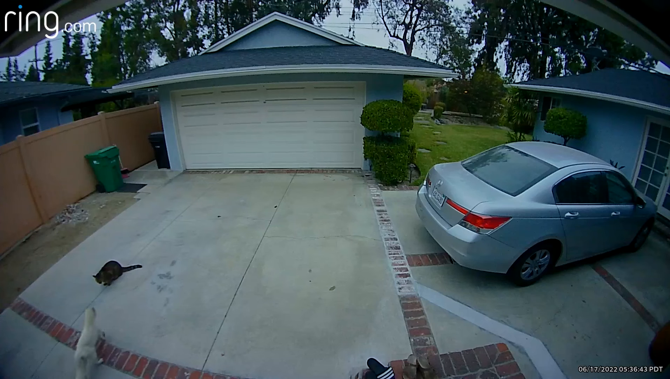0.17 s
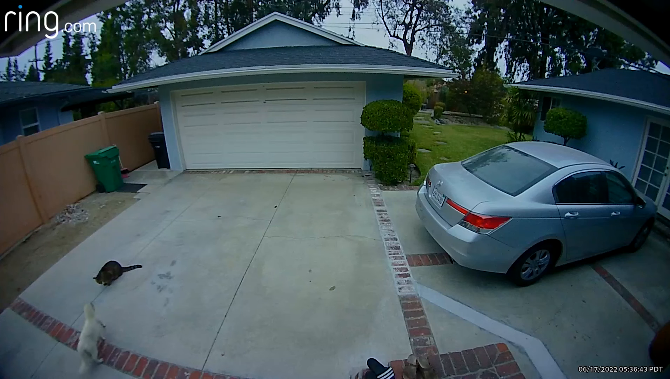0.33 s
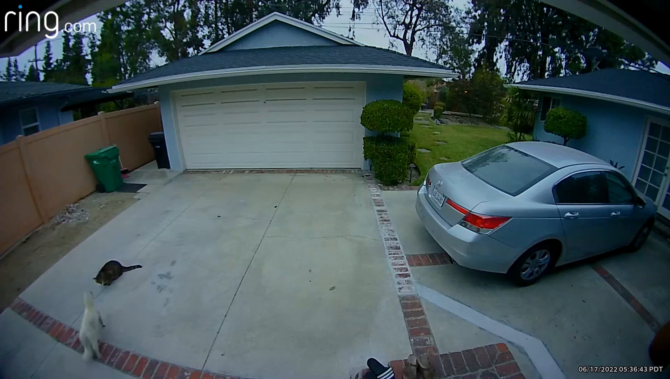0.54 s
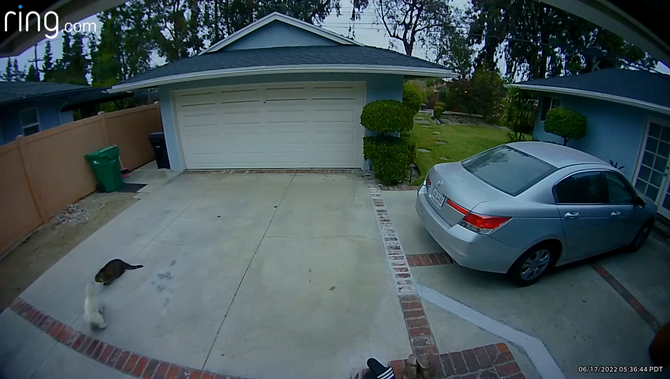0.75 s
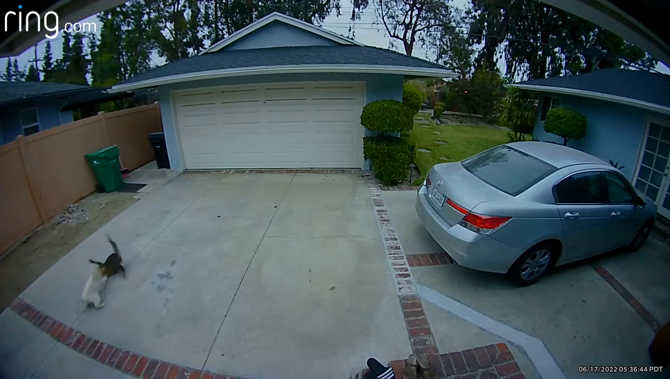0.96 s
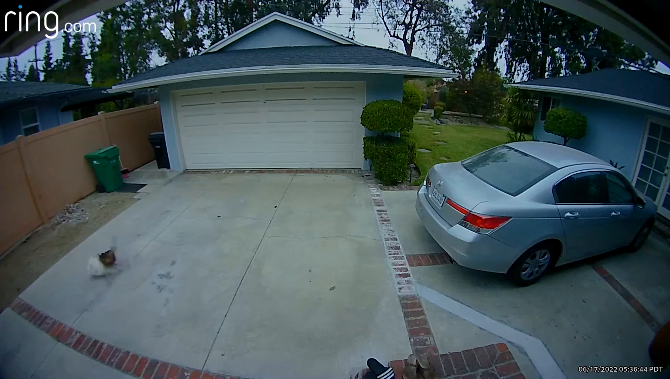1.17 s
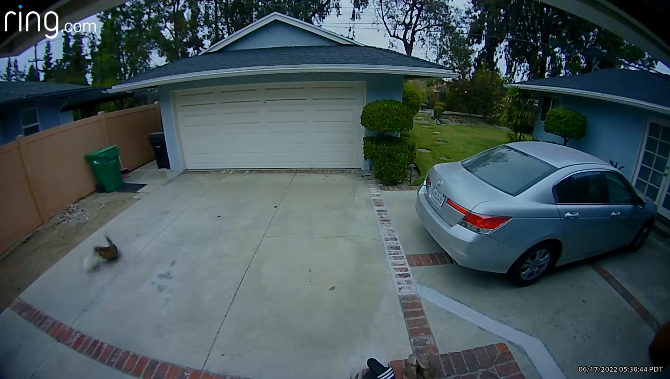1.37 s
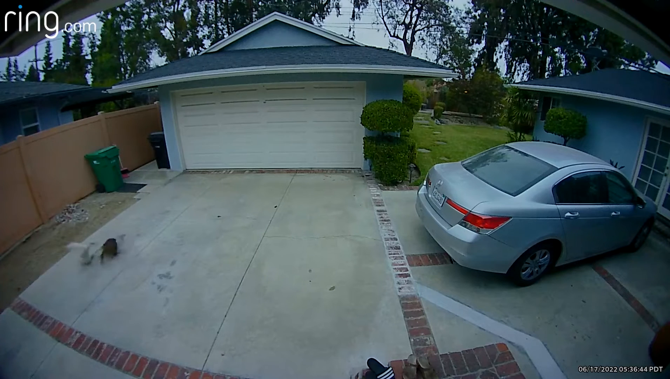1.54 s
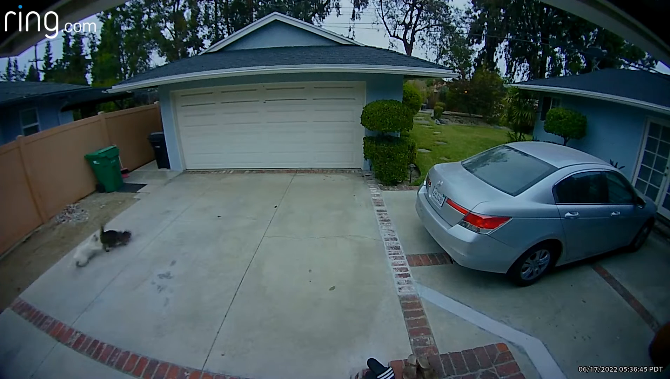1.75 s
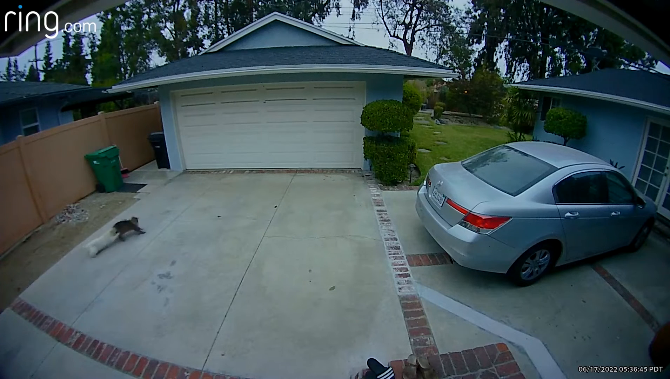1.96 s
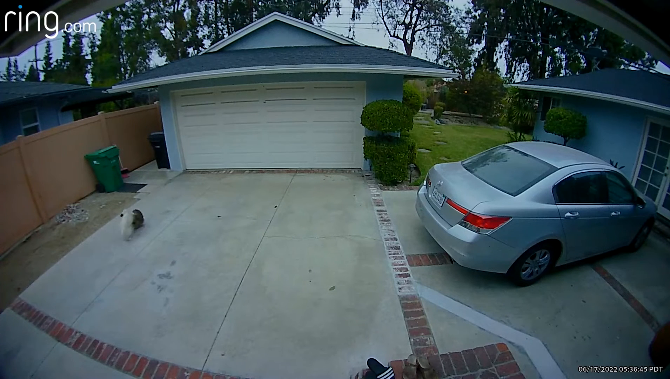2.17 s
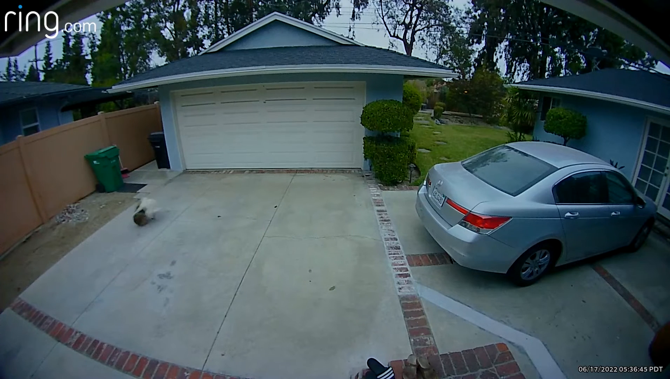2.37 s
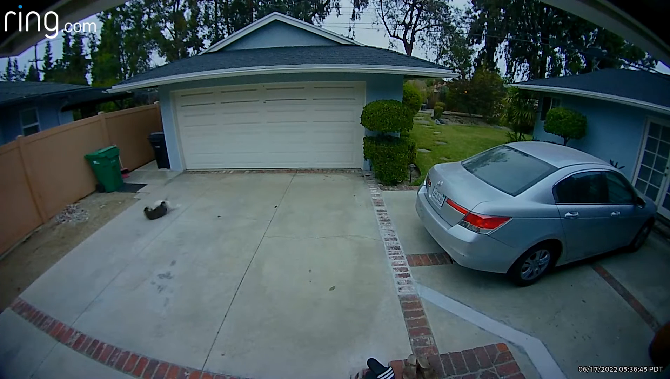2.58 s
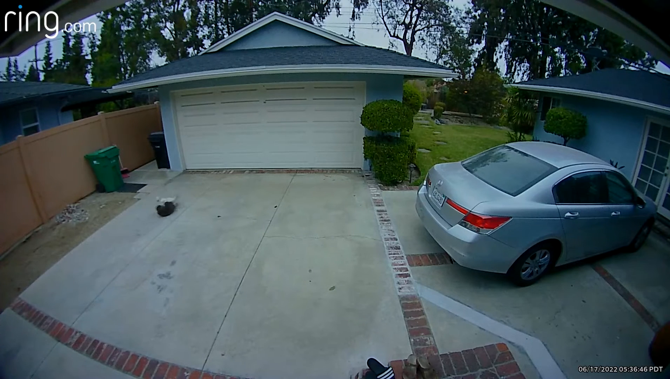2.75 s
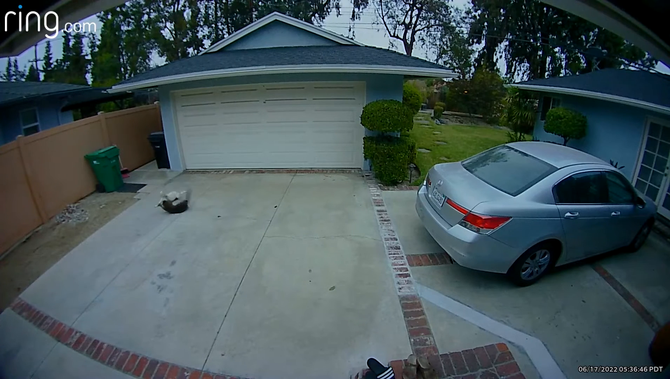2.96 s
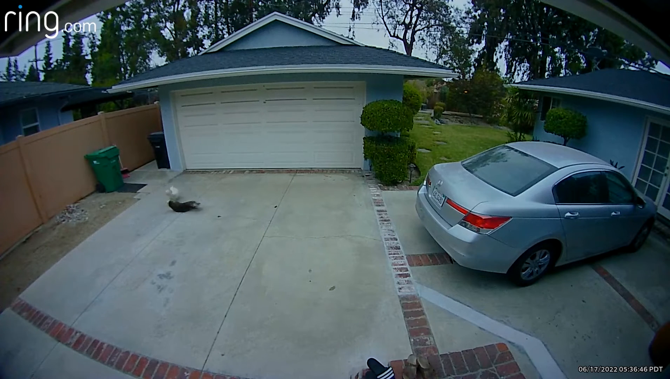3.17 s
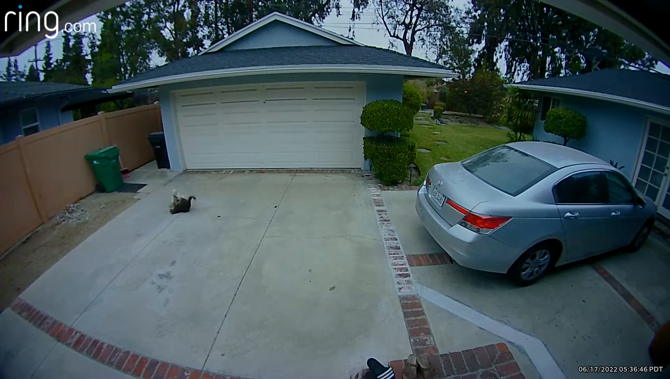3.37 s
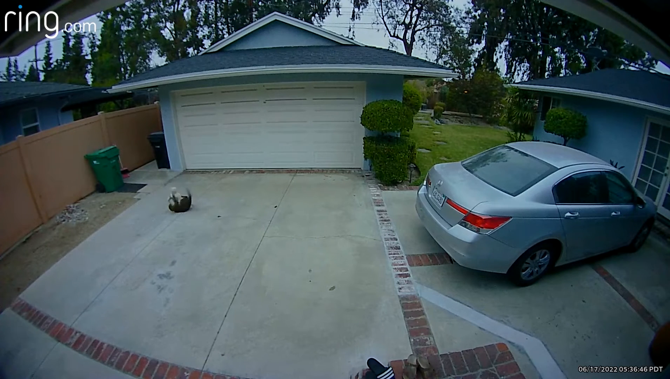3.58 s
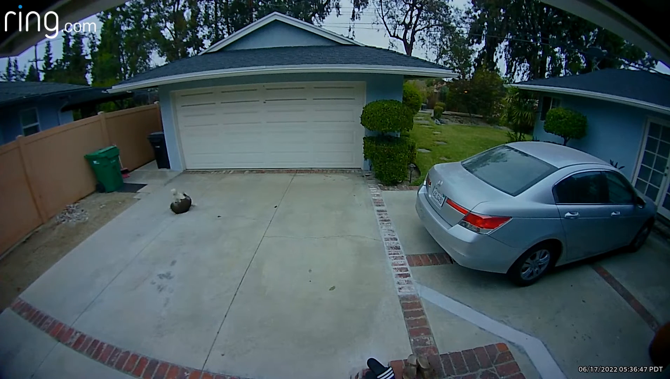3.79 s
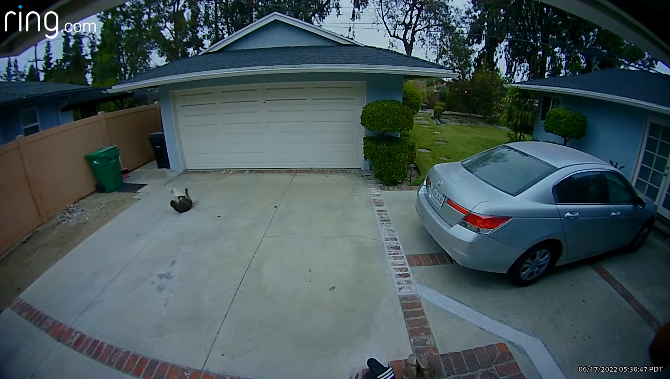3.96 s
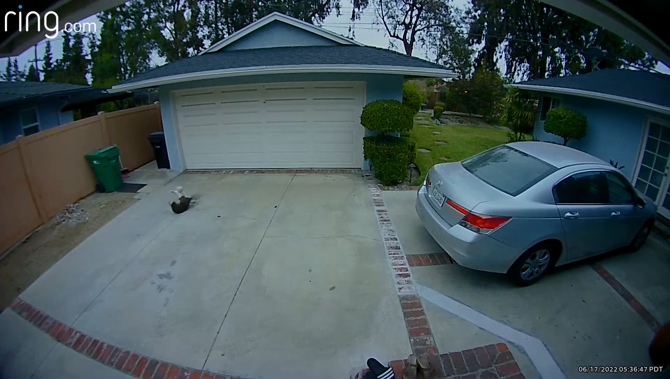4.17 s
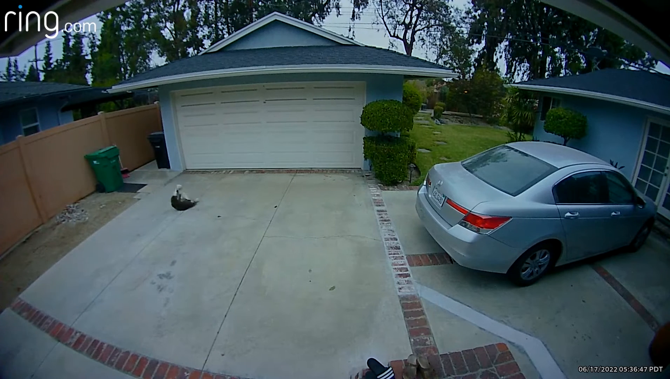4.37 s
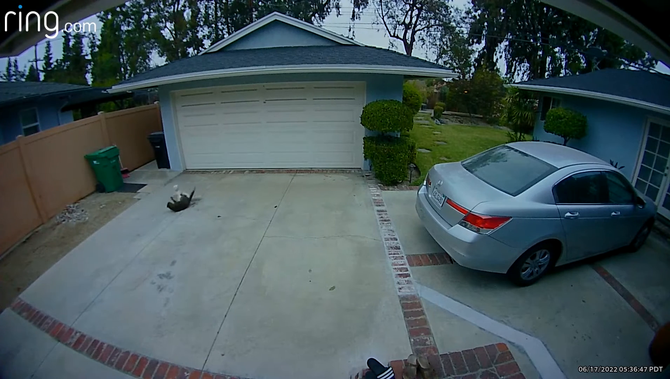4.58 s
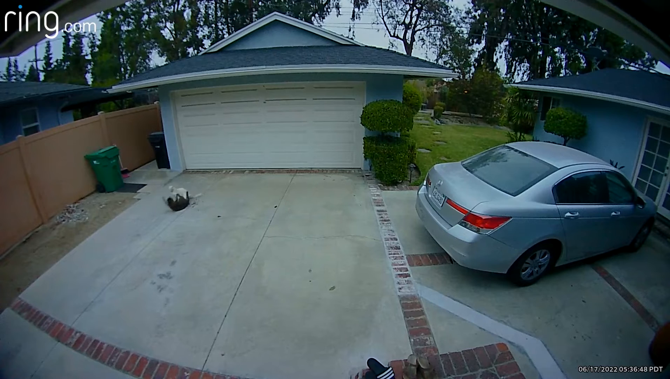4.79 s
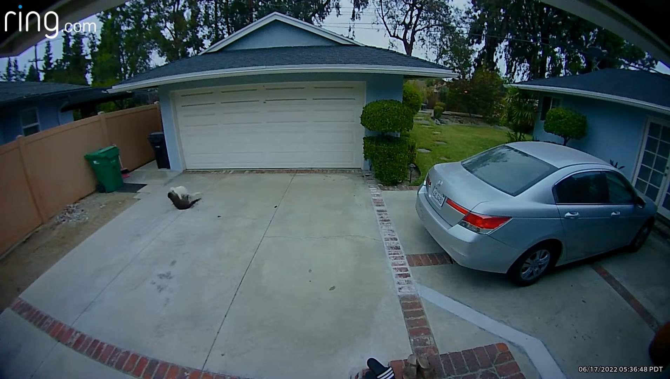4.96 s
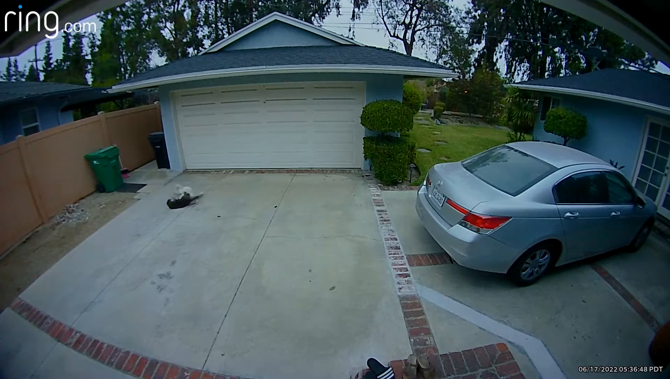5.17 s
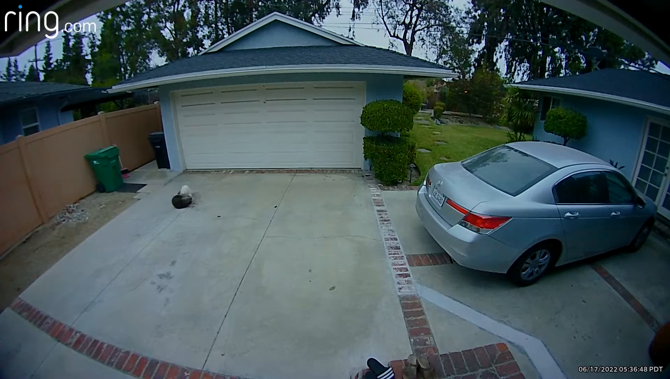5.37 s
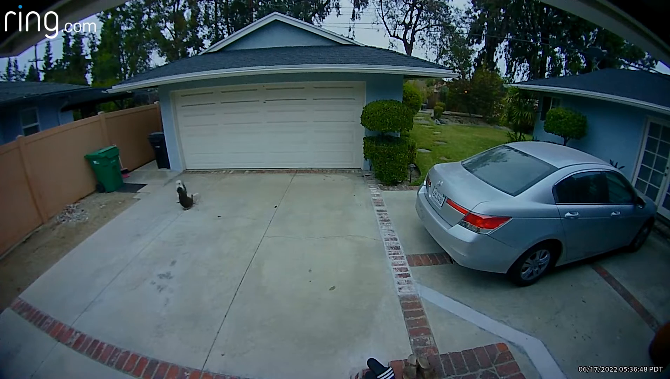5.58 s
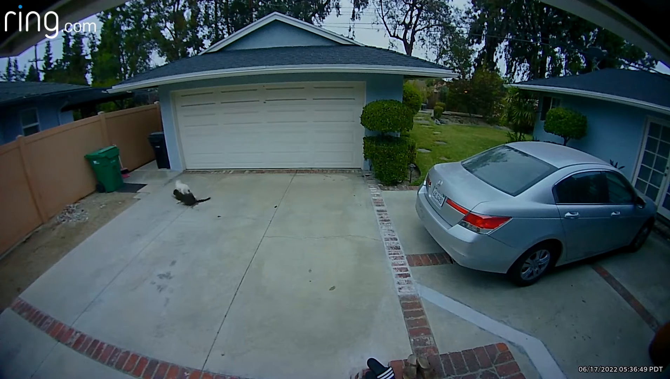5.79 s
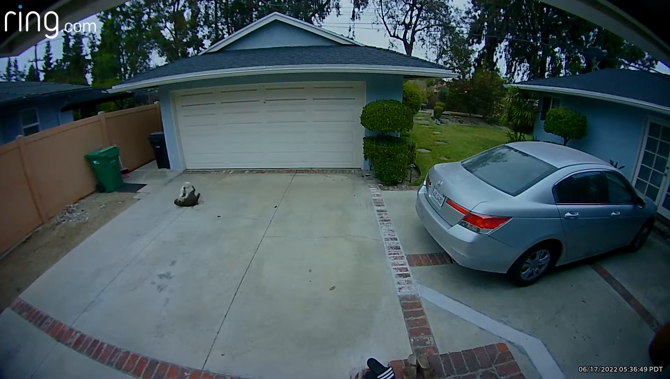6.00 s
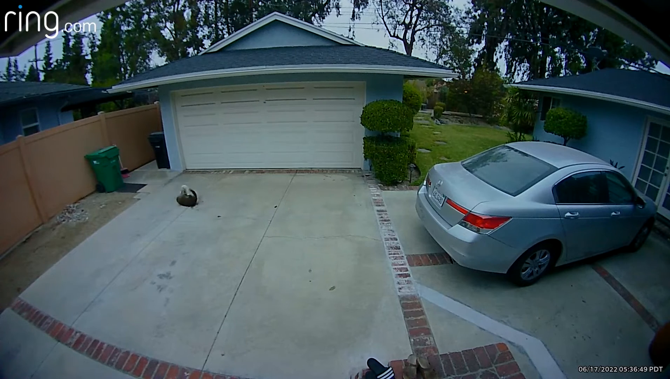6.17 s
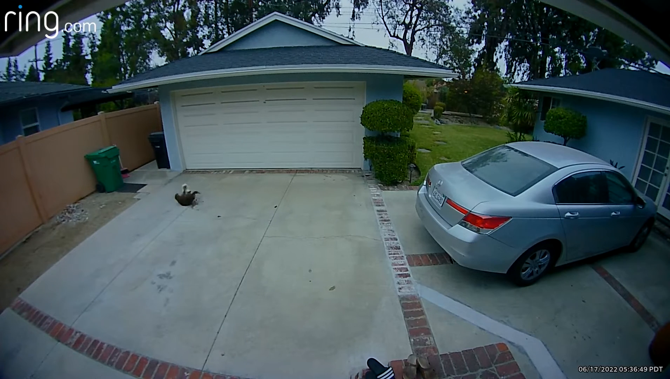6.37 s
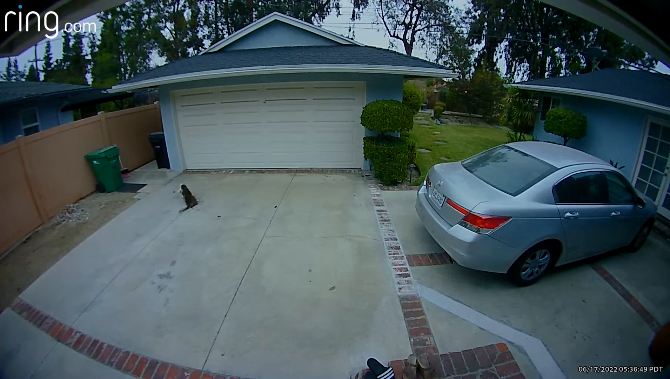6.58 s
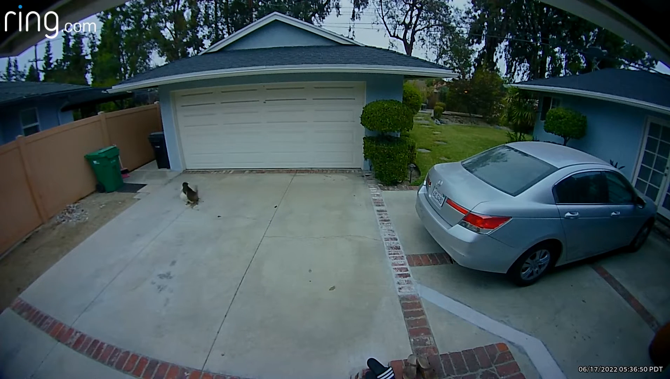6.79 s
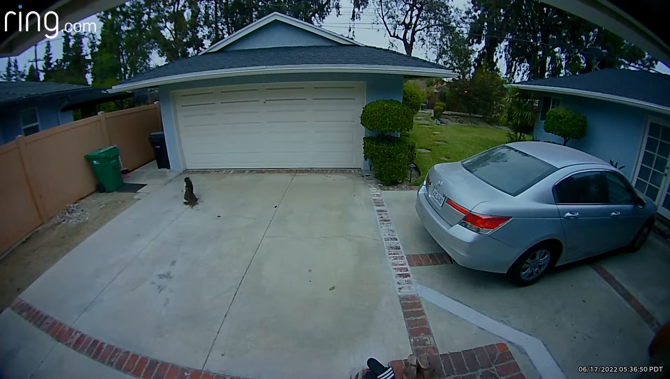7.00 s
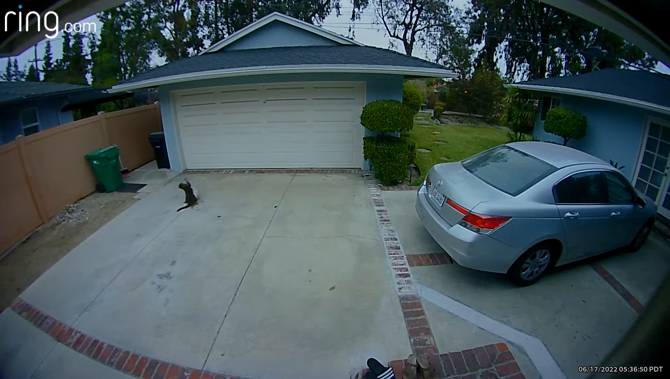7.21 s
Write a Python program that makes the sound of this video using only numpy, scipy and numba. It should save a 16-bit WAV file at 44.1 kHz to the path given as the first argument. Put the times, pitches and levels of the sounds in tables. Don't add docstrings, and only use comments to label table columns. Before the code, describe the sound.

Outdoors on a concrete driveway, a small bird chips faintly before a cat's yowl climbs into a piercing scream. Two cats then shriek over each other in ragged, rough-voiced bursts. Short pauses hold gasps, wheezes, a snapped bark and dull body scuffling. After a longer breathy lull, a yelp leads to renewed screaming that breaks into harsh digital crackle. A cheap door camera microphone clips loudly, with short reflections from the walls.

```python
import sys
import numpy as np
from scipy import signal
from scipy.fft import rfft, irfft
from scipy.io import wavfile
from scipy.ndimage import uniform_filter1d
from numba import njit

SR = 44100
rng = np.random.default_rng(int(sys.argv[2]) if len(sys.argv) > 2 else 0)


def log_audio(samples):
    frames = np.atleast_2d(samples).T
    limited = np.clip(frames, -1, 1)
    pcm = np.round(limited * 32767).astype(np.int16)
    wavfile.write(sys.argv[1], SR, pcm)


def decibels_to_gain(level_db):
    exponent = np.asarray(level_db, float) / 20
    return 10 ** exponent


N = 319283
CAMERA_HZ = 16000
OVERFLOW_S = 6.38

# (time [s], pitch [Hz], level [dB])
RISE = [(0.41, 503.5, -51), (0.444, 543.6, -34.5), (0.48, 607, -31.5), (0.518, 737, -24),
        (0.59, 705.6, -17.5), (0.68, 726.8, -15.5), (0.695, 690, -12.5), (0.8, 823.5, -9),
        (0.83, 973.5, -10),
        (0.84, 1016, -5), (0.95, 1127, -1), (0.982, 1252, -3), (1.01, 1247, -1), (1.02, 1234, -5),
        (1.032, 1170, -8), (1.05, 1174, -8.5)]
BLUR = [(1.03, 1171, -15), (1.05, 1174, -7.5), (1.08, 1305, -3.5), (1.15, 1260, -6.5), (1.2, 1336, -7),
        (1.25, 1261, -8), (1.29, 1146, -19.5)]
RAGGED = [(1.26, 1088, -12), (1.31, 1200, -9.5), (1.42, 1322, -11), (1.48, 1309, -13), (1.51, 1148, -8),
          (1.54, 1258, -15), (1.58, 1260, -47)]
SAG = [(1.26, 1031, -13), (1.34, 978, -17.5), (1.42, 879, -14), (1.5, 843, -15), (1.56, 839, -22),
       (1.59, 846.4, -10.5), (1.65, 806, -33.5)]
YAP = [(1.652, 920, -23), (1.67, 937.6, -12), (1.71, 955, -9), (1.755, 965, -12), (1.785, 924, -18.5),
       (1.83, 950, -52)]
POUNCE = [(2.276, 624, -43), (2.293, 651, -10.5), (2.33, 618, -12), (2.36, 650, -25)]
LONG = [(2.278, 628, -37), (2.298, 658, -12), (2.33, 801, -9.5), (2.36, 957, -8), (2.4, 975, -12),
        (2.45, 975, -10.5), (2.49, 1034, -9), (2.54, 874, -9.5), (2.6, 926.4, -11.5),
        (2.63, 997, -4), (2.655, 1109, -11), (2.7, 1056, -12), (2.75, 924.4, -11.5), (2.78, 870.5, -11.5),
        (2.85, 945, -8), (2.919, 921.6, -12), (2.951, 856, -11.5), (2.98, 817, -17)]
TIRED = [(2.96, 837.3, -11), (3.03, 825, -13), (3.12, 920.3, -9.5), (3.18, 826, -11.5),
         (3.36, 881.4, -12.5), (3.39, 865, -22), (3.42, 880, -31)]
FADE = [(3.32, 766, -12.5), (3.36, 756.4, -12.5), (3.45, 777.5, -13), (3.5, 750, -41)]
LUNGE = [(3.685, 627, -28.5), (3.712, 646, -13.5), (3.75, 735.4, -11), (3.8, 796, -11.5)]
THIRD = [(3.7, 1086, -30.5), (3.74, 1113, -14.5), (3.8, 1143, -10), (3.85, 1222, -6), (3.92, 1159, -11.5),
         (3.98, 1164, -6)]
CRACKED = [(3.93, 1051, -13.5), (4.0, 1083, -8.5), (4.05, 1061, -8.5), (4.09, 1072, -4.5), (4.13, 1009, -8),
           (4.17, 938, -17)]
SETTLE = [(4.14, 932.5, -10.5), (4.2, 943, -10), (4.33, 918, -10.5), (4.38, 783.3, -11.5), (4.45, 763, -10),
          (4.505, 850, -10), (4.53, 771, -9), (4.58, 813.4, -10), (4.62, 823, -16.5)]
SHRIEK = [(4.51, 997, -19.5), (4.55, 996, -9.5), (4.585, 1106, -7), (4.64, 1113, -10), (4.68, 1101, -21),
          (4.71, 1037, -28)]
MOAN = [(4.66, 753, -13.5), (4.7, 776.3, -13.5), (4.76, 789.7, -11), (4.82, 785, -16.5), (4.84, 800, -41)]
YELP = [(5.85, 644, -55), (5.87, 663.7, -17), (5.91, 739.8, -12), (5.96, 883.5, -12.5), (6.004, 920, -10.5),
        (6.068, 955, -13.5), (6.11, 983, -30), (6.17, 960, -58)]
LAST = [(6.41, 732, -17), (6.44, 797, -10), (6.49, 779, -8), (6.52, 797.7, -8.5), (6.6, 785.7, -9.5),
        (6.65, 830, -7.5), (6.7, 781.4, -10), (6.78, 761.2, -11.5), (6.9, 763.7, -14)]
CLOSE = [(6.88, 759, -11.5), (6.97, 789, -10), (7.02, 754.6, -12.5), (7.09, 792, -9.5), (7.2, 788, -12.5),
         (7.24, 814, -10)]
# (time [s], pitch [Hz], level [dB])
SNARL = [(2.33, 1159, -8.5), (2.42, 1155, -12.5), (2.6, 1192, -19.5), (2.74, 1114, -9), (2.8, 1092, -16)]
GROAN = [(3.0, 1225, -11), (3.08, 1109, -12.5), (3.2, 1094, -13), (3.33, 1136, -15.5), (3.44, 1130, -25)]
RIVAL = [(4.17, 1164, -11), (4.2, 1165, -10.5), (4.32, 1165, -11), (4.46, 1186, -28)]
SPIT = [(5.9, 742, -20), (5.96, 777, -10), (6.04, 743, -17), (6.1, 732, -33)]
GRUNT = [(6.27, 613, -36), (6.3, 593.6, -17.5), (6.33, 676, -12.5), (6.35, 640.8, -16), (6.39, 664, -8),
         (6.425, 747, -18.5)]
REPLY = [(6.5, 1070, -15), (6.55, 1090, -13), (6.65, 1110, -17), (6.77, 1130, -15), (6.88, 1080, -16.5),
         (7.0, 1010, -16.5), (7.07, 1125, -12.5), (7.16, 1160, -18), (7.24, 1080, -11)]
ANSWER = [(6.78, 600.7, -34), (6.82, 613.8, -14), (6.9, 670.7, -13), (7.02, 649, -20)]
# (time [s], pitch [Hz], level [dB])
SNAP = [(2.085, 703, -48), (2.1, 707, -24.5), (2.115, 697, -12), (2.13, 695, -22.5), (2.16, 684, -31.5),
        (2.22, 705, -54)]
HUFF = [(5.245, 641, -53), (5.27, 639, -19.5), (5.3, 676.4, -13), (5.335, 687.4, -10.5), (5.37, 669, -13.5),
        (5.41, 698, -27), (5.47, 663, -35.5)]


def unit(x):
    return x / np.sqrt(np.mean(x ** 2))


@njit
def svf(x, hz, width_hz):
    y, b, l, g, k = np.empty(len(x)), 0., 0., 0., 0.
    for i in range(len(x)):
        if i % 16 == 0:
            g, k = np.tan(np.pi * hz[i] / SR), width_hz / hz[i]
        v = (b + g * (x[i] - l)) / (1 + g * (g + k))
        b, l, y[i] = 2 * v - b, l + 2 * g * v, k * v
    return y


def band(x, hz, width_hz):
    return svf(x, hz + np.zeros(len(x)), 1. * width_hz)


def butter(x, order, hz, kind="low"):
    return signal.sosfilt(signal.butter(order, hz, kind, fs=SR, output="sos"), x)


def wander(n, rate_hz):
    return unit(butter(rng.standard_normal(n), 2, rate_hz))


def phase(hz):
    return 2 * np.pi * np.cumsum(hz) / SR


def play(table):
    s, *columns = np.transpose(table)
    start = int(s[0] * SR)
    t = np.arange(start, min(int(s[-1] * SR), N)) / SR
    return start, [np.interp(t, s, c) for c in columns]


def swell(start_s, hold_s, db, rise_s, fall_db_s):
    swing_db = 30
    top_s = start_s + rise_s
    end_s = top_s + hold_s
    rows = [(start_s, db - swing_db), (top_s, db), (end_s, db), (end_s + swing_db / fall_db_s, db - swing_db)]
    start, (level_db,) = play(rows)
    return start, level_db


def add(out, start, x):
    i = np.arange(len(x))
    out[start:start + len(x)] += x * np.clip(np.minimum(i, i[::-1]) / (0.0076 * SR), 0, 1)


def steady(x):
    return x / np.sqrt(uniform_filter1d(x ** 2, size=2048) + 1e-12)


def yard():
    # (frequency [Hz], density [dB per Hz])
    spectrum = [(59, -38.5), (100, 2.5), (180, -4.5), (295, 4.5), (475, -6.5), (903, -2.5), (1560, -7),
                (4530, -9), (5540, 11.5), (6910, 0.5), (8000, -31), (10400, -58), (17600, -120)]
    f = np.fft.rfftfreq(N, 1 / SR) + 1
    hz, db = np.transpose(spectrum)
    shape = decibels_to_gain(np.interp(np.log(f), np.log(hz), db))
    hiss = irfft(rfft(rng.standard_normal(N)) * shape, N)
    return decibels_to_gain(-58.5 + 0.7 * wander(N, 8.4)) * unit(hiss)


def bird():
    # (time [s], peak [dB], pitch [Hz], t60 [s])
    chips = [(0.0014, -46, 5910, 0.072), (0.1111, -41, 5600, 0.036), (0.134, -32, 5650, 0.036),
             (0.2598, -43, 5350, 0.014), (0.278, -33, 5790, 0.11), (0.2893, -39, 5530, 0.028),
             (0.414, -43, 5860, 0.052), (0.433, -29.5, 5920, 0.081), (0.444, -30, 5570, 0.053)]
    out, t = np.zeros(N), np.arange(int(.08 * SR)) / SR
    for s, db, hz, t60 in chips:
        shape = (1 - np.exp(-t / 0.00075)) * decibels_to_gain(-60 * t / t60)
        add(out, int(s * SR), 1.66 * decibels_to_gain(db) * shape * np.sin(2 * np.pi * hz * (t - 0.5 * t ** 2)))
    return out


def scuffle():
    # (start [s], hold [s], level [dB])
    rolls = [(1.401, 0.029, -45), (1.535, 0.2, -33.5), (1.864, 0.13, -34.5), (2.067, 0.081, -30.5),
             (3.448, 0.044, -40), (3.655, 0.011, -33), (4.718, 0.052, -42), (4.895, 0.15, -29),
             (5.245, 0.36, -31.5), (5.703, 0.051, -34), (5.895, 0.21, -43.5), (6.253, 0.02, -32)]
    out = np.zeros(N)
    for s, hold_s, db in rolls:
        start, level_db = swell(s, hold_s, db, rise_s=0.037, fall_db_s=304.5)
        n = len(level_db)
        air = rng.standard_normal(n) * decibels_to_gain(6.7 * wander(n, 6.0))
        add(out, start, decibels_to_gain(level_db) * unit(band(band(air, 300, 190), 380, 490)))
    return out


def whistle():
    # (time [s], pitch [Hz], level [dB])
    curve = [(4.93, 3450, -26), (5.0, 3470, -41), (5.25, 3470, -41)]
    out = np.zeros(N)
    start, (hz, db) = play(curve)
    add(out, start, decibels_to_gain(db + 4.3 * wander(len(hz), 48)) * np.sin(phase(hz)))
    return out


def chop(n):
    return 1 + 0.4 * np.cos(phase(87.8 * (1 + 0.17 * wander(n, 42))))


def wheezes():
    # (start [s], hold [s], level [dB], resonance [Hz])
    bursts = [(1.883, 0.017, -30, 3150), (1.943, 0.032, -24.5, 1206), (2.126, 0.019, -21, 2960),
              (4.955, 0.05, -21, 1290), (5.031, 0.038, -26.5, 1220), (5.228, 0.017, -41, 2330),
              (5.581, .06, -36.5, 2100), (5.632, 0.022, -40, 3130), (5.645, 0.014, -36.5, 1410),
              (5.717, 0.04, -30.5, 1165), (5.747, 0.028, -35.5, 2120), (5.729, 0.055, -42, 3870)]
    out = np.zeros(N)
    for s, hold_s, db, hz in bursts:
        start, level_db = swell(s, hold_s, db, rise_s=0.014, fall_db_s=502.5)
        n, width_hz = len(level_db), hz / 7.2
        centre_hz = hz * (1 + 0.02 * wander(n, 20))
        ring = band(band(rng.standard_normal(n), centre_hz, width_hz), centre_hz, width_hz)
        add(out, start, decibels_to_gain(level_db) * chop(n) * unit(ring))
    return out


def gasp(db, hiss_db):
    # (frequency [Hz], width [Hz], level [dB])
    throat = [(917, 79, 6.5), (1292, 340, 6.5), (2100, 38, -3.5), (2556, 480, 2), (3124, 1120, 10),
              (3470, 510, -24)]
    n = len(db)
    flap = np.cos(phase(240 * (1 + 0.55 * wander(n, 72))))
    air = rng.standard_normal(n) * (1 + 0.37 * flap) * decibels_to_gain(1.5 * wander(n, 25))
    voiced = np.zeros(n)
    for hz, width_hz, mode_db in throat:
        mode = band(band(band(air, hz, width_hz), hz, 2 * width_hz), hz, 2 * width_hz)
        voiced += decibels_to_gain(mode_db) * mode / np.sqrt(width_hz)
    hiss = band(band(band(air, 5800, 1500), 5800, 1800), 5800, 2000)
    return decibels_to_gain(db) * (unit(voiced) + decibels_to_gain(hiss_db) * unit(hiss))


def gasps():
    # (start [s], hold [s], level [dB], hiss [dB])
    breaths = [(1.858, 0.027, -32.5, -4.5), (1.936, 0.026, -23.5, -3), (2.085, 0.0037, -15.5, 0.5),
               (4.908, 0.13, -26, -6), (5.356, 0.17, -28, -2), (5.597, 0.038, -40, -5),
               (5.708, 0.047, -36, -4.5)]
    out = np.zeros(N)
    for s, hold_s, db, hiss_db in breaths:
        start, level_db = swell(s, hold_s, db, rise_s=0.037, fall_db_s=339.5)
        add(out, start, gasp(level_db, hiss_db))
    return out


def cry(hz, db, upper_db, chest_db, treble_db, clear_db, mouth_hz, upper_hz, rough, doubling):
    n, rough, doubling = len(hz), np.clip(rough, 0, 1), np.clip(doubling, 0, 1)
    jitter = 1 + .1 * rough * wander(n, 220) + .05 * rough * wander(n, 30)
    half = phase(hz * jitter) / 2
    folds = sum((doubling if k % 2 else 1) * np.cos(k * half) for k in range(2, 21))
    folds = folds * decibels_to_gain(10 * np.minimum(rough, .3) * wander(n, 35))
    folds = folds * (1 + 2.0 * np.minimum(rough, .35) * wander(n, 220))
    breath = 6. * rough ** 2 * rng.standard_normal(n) * (1 + 1.7 * np.cos(2 * half))
    air = folds + breath
    width_hz = min(420 + 1300 * rough.mean(), 950)
    mouth = band(band(band(air, mouth_hz, width_hz), mouth_hz, 1.3 * width_hz), mouth_hz, 1500)
    chest = band(band(air, hz, 390), hz, 490)
    upper = band(band(air, upper_hz, 700), upper_hz, 900)
    teeth = band(band(band(air, 5100, 2200), 5500, 2200), 6000, 3500)
    core = phase(hz * (1 + .006 * wander(n, 40)))
    clear = band(sum(decibels_to_gain(4.9 * wander(n, 14)) * np.cos(k * core) for k in range(3, 10)), 4000, 4000)
    voice = steady(mouth) + decibels_to_gain(chest_db) * steady(chest) + decibels_to_gain(upper_db) * steady(upper)
    voice = voice + decibels_to_gain(treble_db) * steady(teeth) + decibels_to_gain(clear_db) * unit(clear)
    knee_db, squeeze = -17, 1.024
    return voice * decibels_to_gain(db + squeeze * np.maximum(db - knee_db, 0))


def scream(hz, db, mouth, upper_db, chest_db, rough, rough_end, doubling, clear_db,
           upper_mouth=1.46, follow=0.65):
    full_db, opening_s, restless_db = -9.5, 0.045, 4.
    n = len(hz)
    closed = np.exp(-np.arange(n) / SR / opening_s)
    quiet_start = db[0] < full_db - 10
    shut = closed * quiet_start
    shut_db = -20.5 * shut
    bursts = quiet_start and full_db - 10 < db[int(opening_s * SR)]
    mouth = mouth * (1 - 0.097 * bursts * closed)
    weak_db = np.minimum(db - full_db, 0)
    fidget = [wander(n + SR // 8, 9.)[-n:] for _ in range(4)]
    rough = (rough + (rough_end - rough) * np.linspace(0, 1, num=n) ** 1.6) * (1 + .25 * fidget[3])
    mouth_hz = np.minimum(mouth * (hz.mean() + follow * (hz - hz.mean())), 2500)
    upper_hz = np.minimum(upper_mouth * mouth_hz, 3350)
    upper_db = upper_db + shut_db + 1.13 * np.maximum(weak_db, -10) + restless_db * fidget[0]
    chest_db = chest_db - 13 * shut - restless_db * fidget[1]
    treble_db = -14 + shut_db + 1.62 * np.maximum(weak_db, -20) + restless_db * fidget[1]
    clear_db = clear_db + shut_db + 0.71 * weak_db
    doubling = doubling * (1 + 0.7 * fidget[2])
    return cry(hz, db, upper_db, chest_db, treble_db, clear_db, mouth_hz, upper_hz, rough, doubling)


def barks():
    # (curve, mouth [x pitch], upper mouth [dB], chest [dB], roughness at start [0-1],
    # at end [0-1], period doubling [0-1], clear overtones [dB])
    bark_voices = [(SNAP, 2.1, -13, -27, .33, 0.55, 0.48, -40),
                   (HUFF, 2.12, -14, -30, .36, 0.49, 0.63, -31)]
    out = np.zeros(N)
    for curve, *voice in bark_voices:
        start, (hz, db) = play(curve)
        add(out, start, chop(len(hz)) * scream(hz, db, *voice, upper_mouth=2.2))
    return out


def screams():
    # (curve, mouth [x pitch], upper mouth [dB], chest [dB], roughness at start [0-1],
    # at end [0-1], period doubling [0-1], clear overtones [dB],
    # optional: upper mouth [x mouth], share of pitch swings the mouth follows [0-1])
    voices = [(RISE, 2.65, -7.5, -34.5, 0.04, 0.3, 0.24, -12, 1.42, 0.22),
              (BLUR, 1.8, -10, -13, .42, 0.42, 1, -11.5), (POUNCE, 2.2, -17, -35, 0.21, 0.26, 0.27, -33),
              (RAGGED, 1.857, -10.5, -16, 0.46, 0.265, 0.89, -24),
              (SAG, 1.956, -1, -11, 0.315, 0.23, 0.32, -28), (YAP, 1.6, -25, -5, 0.33, 0.25, 0.93, -43),
              (FADE, 2.027, -9.5, -25, 0.25, 0.21, 0.57, -19.5),
              (LONG, 1.96, 0.066, -15, 0.27, 0.39, 0.33, -14),
              (TIRED, 1.95, -6.5, -14, 0.24, 0.26, 0.31, -13.5),
              (LUNGE, 2.22, -5, -16.5, 0.48, 0.47, 0.83, -36),
              (THIRD, 1.8, -30, -10, 0.29, 0.35, 0.33, -24),
              (CRACKED, 1.74, -4.5, -15, .45, 0.23, 0.77, -24, 1.72),
              (SETTLE, 1.97, -4.5, -19.5, 0.25, 0.18, 0.48, -18.5),
              (SHRIEK, 2.03, -5.5, -11, 0.3, 0.22, 0.18, -20.5),
              (MOAN, 2.01, -7, -12.5, 0.18, 0.19, 0.5, -39),
              (YELP, 1.97, -1.5, -15, 0.26, 0.502, 0.47, -16, 1.4, 0.73),
              (LAST, 2.03, -4, -28, 0.18, 0.16, 0.35, -30),
              (CLOSE, 1.8, -7.5, -26.5, 0.24, 0.22, 0.47, -30.5),
              (RIVAL, 1.99, -10.5, -17.5, 0.26, 0.49, 0.07, -36),
              (ANSWER, 1.95, -25, -29.5, 0.2, 0.24, 0.29, -29),
              (SNARL, 1.9, -10.5, -22.5, 0.411, 0.55, 1, -30),
              (GROAN, 2.02, -13, -30, 0.36, 0.45, 0.37, -29), (SPIT, 2.4, -9, -28, 0.54, 0.57, 0.31, -42),
              (GRUNT, 1.9, -8.5, -25, 0.27, 0.41, 0.36, -36, 1.7),
              (REPLY, 1.8, -22, -19, .26, 0.31, 0.084, -29)]
    out = np.zeros(N)
    for curve, *voice in voices:
        start, (hz, db) = play(curve)
        add(out, start, scream(hz, db, *voice))
    return out


def walls(x, t60, tail_db):
    # (delay [s], level [dB])
    slaps = [(.0037, -14), (.019, -16), (.033, -18), (.052, -21)]
    t = np.arange(int(.6 * SR)) / SR
    tail = unit(band(rng.standard_normal(len(t)), 1800, 4900)) / np.sqrt(SR)
    response = decibels_to_gain(tail_db - 60 * t / t60) * tail * np.clip(t / 0.014, 0, 1)
    response[0] = 1
    for s, db in slaps:
        response[int(s * SR)] += decibels_to_gain(db)
    return signal.fftconvolve(x, response)[:N]


def scene():
    sources = bird() + scuffle() + whistle() + wheezes() + gasps() + barks() + screams()
    return np.tile(decibels_to_gain(-4.0) * walls(sources, 0.45, 1.) + yard(), (2, 1))


def starve(x, size, width, below_db, spread_db, bass_db, axis=0):
    z = signal.stft(x, nperseg=size, window="cosine")[2]
    bands = np.arange(len(z)) // width
    power = np.add.reduceat(np.abs(z) ** 2, np.arange(0, len(z), width), axis=0)
    power[0] *= decibels_to_gain(2 * bass_db)
    floor_db = below_db + spread_db * rng.standard_normal(power.shape)
    kept = power > power.max(axis=axis) * decibels_to_gain(2 * floor_db)
    grain = 1 + 0.24 * rng.standard_normal(z.shape)
    return signal.istft(z * kept[bands] * grain, nperseg=size, window="cosine")[1][:len(x)]


def headroom(t):
    # (time [s], half length [s], extra room [dB])
    lulls = [(6.394, 0.003, 9), (6.425, .013, 11), (6.81, 0.016, 0.5), (6.951, 0.0073, 4),
             (7.207, 0.014, 13)]
    extra_db = sum(db * np.exp(-((t - s) / half_s) ** 2) for s, half_s, db in lulls)
    return np.where(t < OVERFLOW_S, 40, 3 + extra_db)


def converter(x):
    sharpness = 5.
    headroom_db = headroom(np.arange(len(x)) / CAMERA_HZ)
    y = x / (1 + np.abs(x) ** sharpness) ** (1 / sharpness)
    y = y + 0.038 * np.clip(np.abs(x) - 2.9, 0, 1.5)
    dip = signal.butter(1, [3600, 4900], "band", fs=CAMERA_HZ, output="sos")
    y = y - .5 * signal.sosfiltfilt(dip, y)
    dull = signal.sosfiltfilt(signal.butter(8, 6600, fs=CAMERA_HZ, output="sos"), y)
    wrap = np.where(np.abs(x) > decibels_to_gain(headroom_db), -1.5 * y, 0)
    starved = starve(dull, size=512, width=5, below_db=-35.5, spread_db=7., bass_db=-12)
    return starved + decibels_to_gain(-16) * (y - dull) + wrap


def leak_images(y):
    t = np.arange(N) / SR
    mirror = y * np.cos(2 * np.pi * CAMERA_HZ * t)
    near = butter(mirror, 6, [7800, 8900], "band")
    far = butter(mirror, 2, [8700, 11200], "band") * (t > OVERFLOW_S)
    far = starve(far, size=2048, width=3, below_db=-10, spread_db=5., bass_db=0, axis=None)
    return y + decibels_to_gain(-12.5) * near + decibels_to_gain(-11.0) * butter(far, 8, 8800, "high")


def roll_off(x):
    return signal.sosfilt(signal.butter(12, 15000, fs=SR, output="sos"), x)


def record(dry):
    clip_at, dropout_s, dropout_length_s = 0.44, 6.225, 0.004
    x = butter(dry[0], 3, 190, "high")
    x = signal.resample_poly(x, 160, 441) / clip_at
    y = clip_at * signal.resample_poly(converter(x), 441, 160)[:N]
    y = leak_images(y)
    y = y * (1 - np.exp(-((np.arange(N) / SR - dropout_s) / dropout_length_s) ** 4))
    y = butter(y, 2, 25, "high")
    y = signal.sosfilt(signal.ellip(6, .1, 60, 14800, fs=SR, output="sos"), y)
    return roll_off(np.tile(y, (2, 1)))


dry = scene()
out = record(dry)
log_audio(out)
```